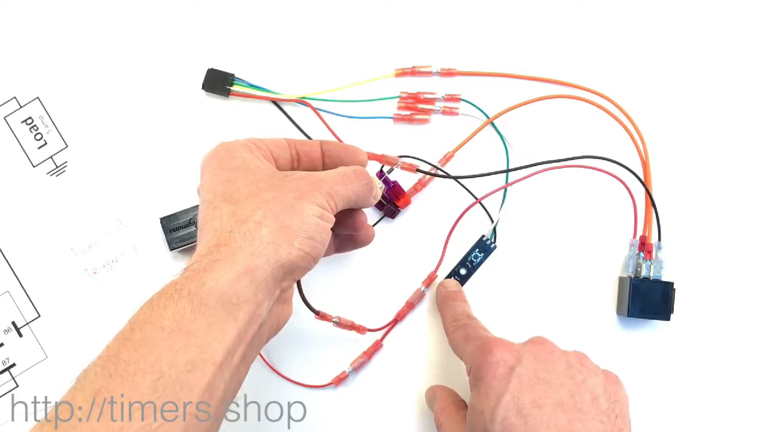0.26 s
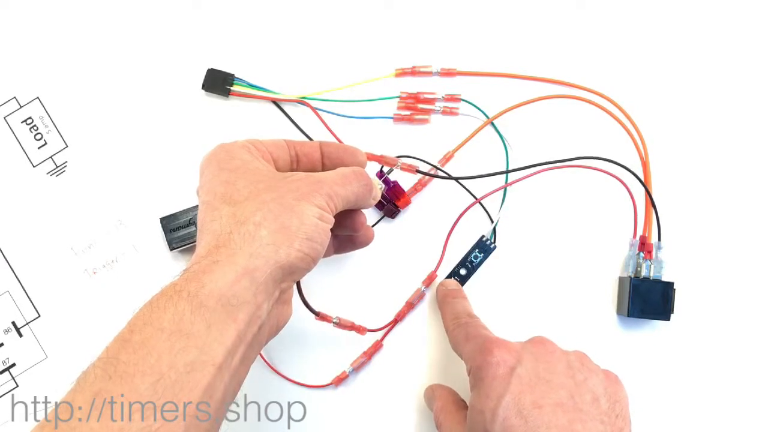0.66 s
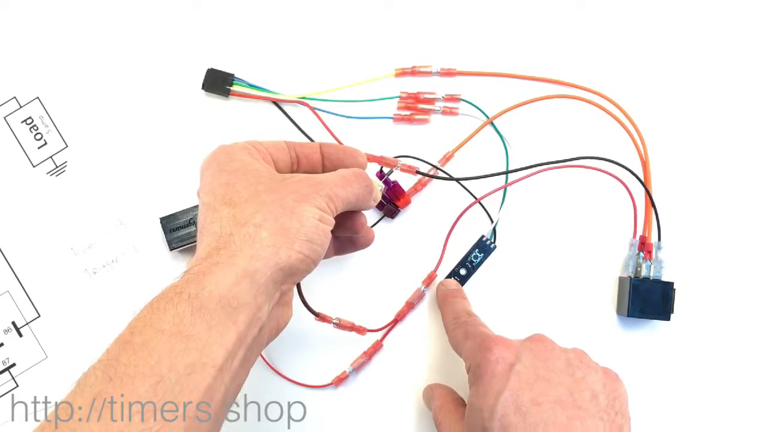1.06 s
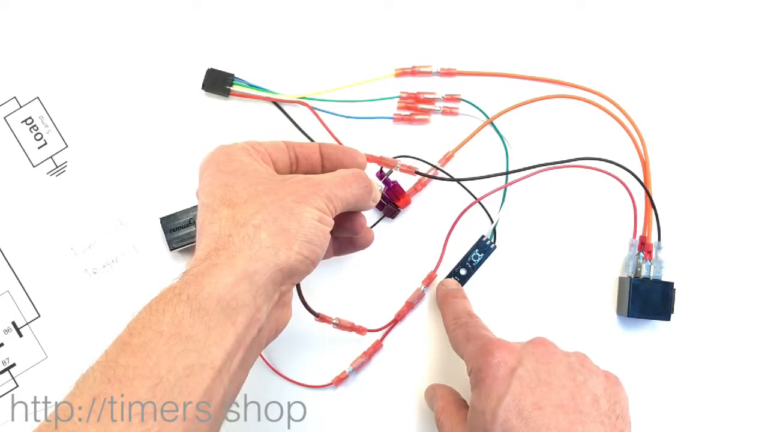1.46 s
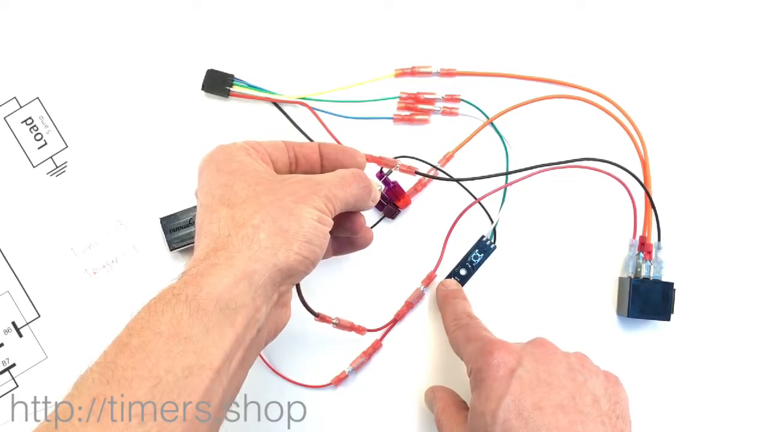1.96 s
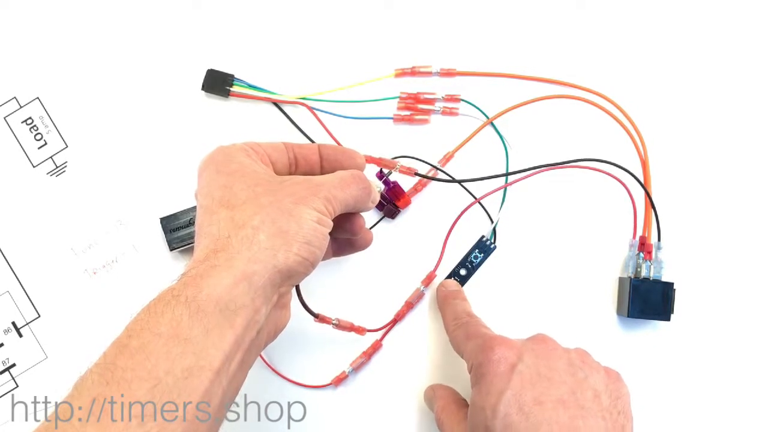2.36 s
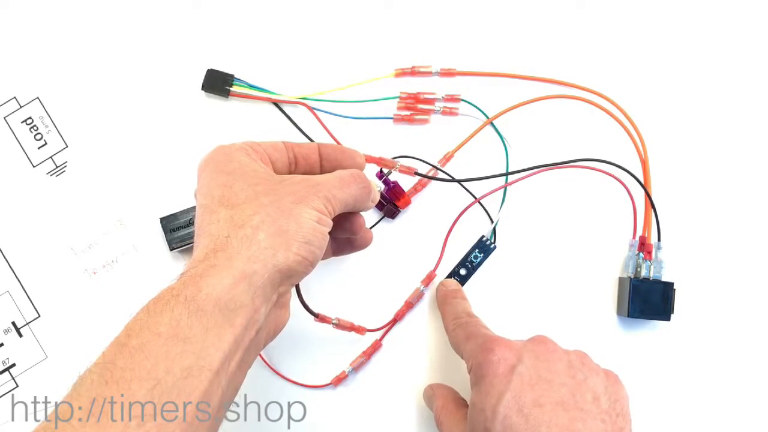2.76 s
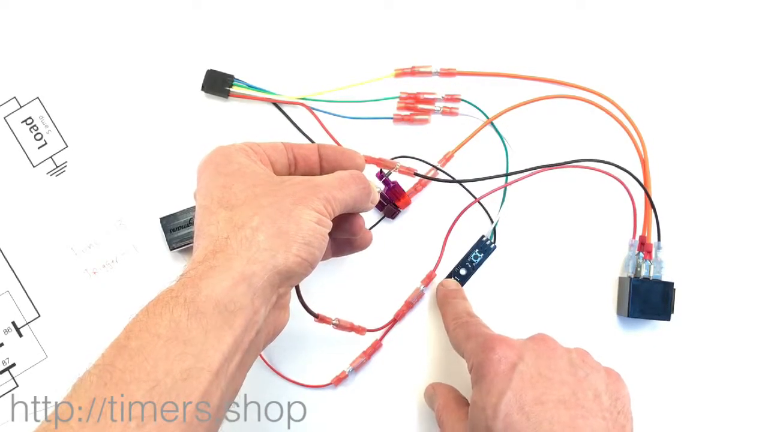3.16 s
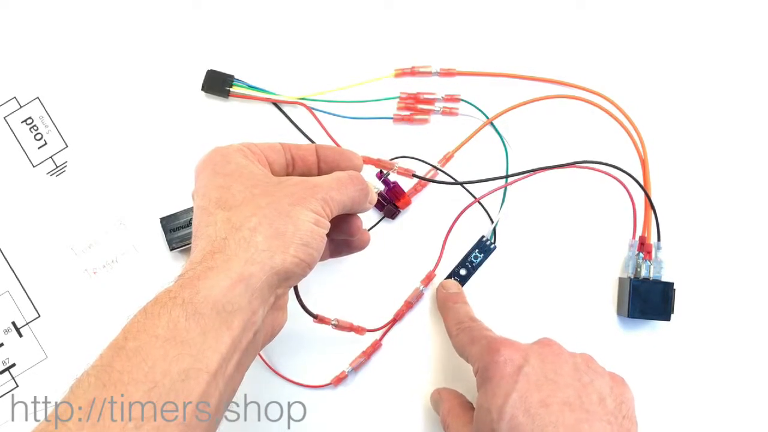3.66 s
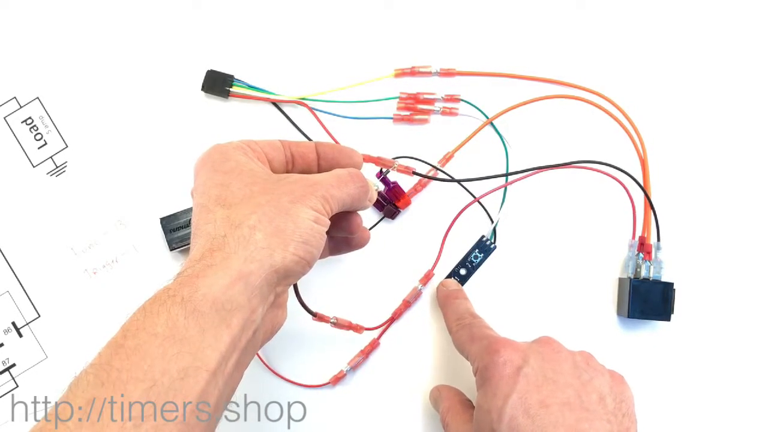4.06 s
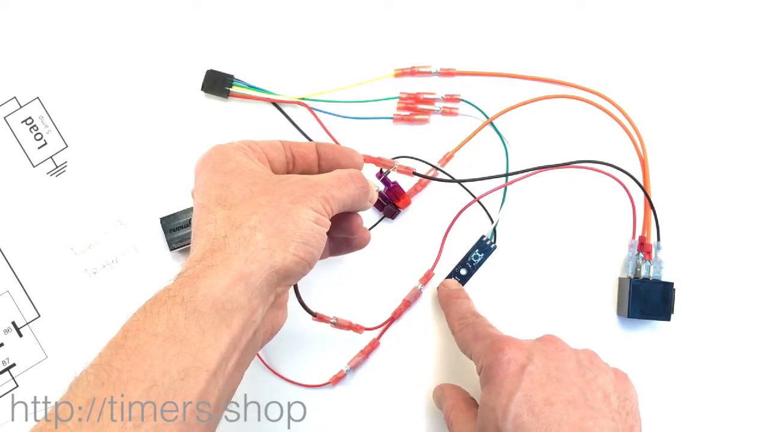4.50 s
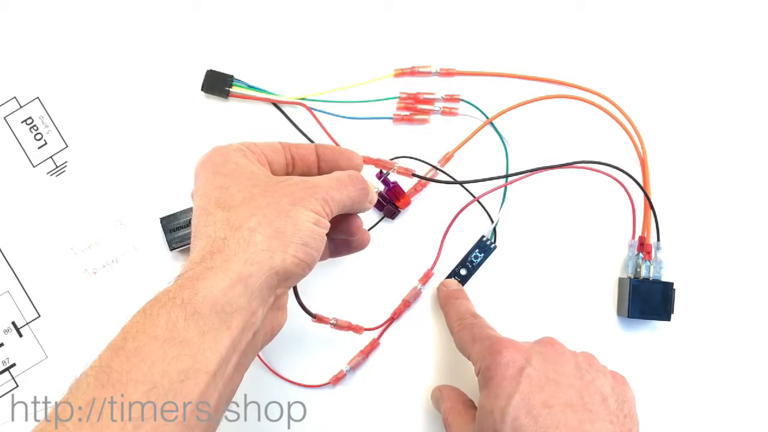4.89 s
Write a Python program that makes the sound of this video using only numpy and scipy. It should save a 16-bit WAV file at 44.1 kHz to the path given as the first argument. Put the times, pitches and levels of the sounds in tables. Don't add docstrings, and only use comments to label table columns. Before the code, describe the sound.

On a desk in a small quiet room, close to the microphone, a tiny relay snaps shut and opens repeatedly at an even pace. Each click is a hard, dry metallic tick with rapid bounces and a slight desk thud. Between them a finger softly snaps a small push button. Faint electrical hiss switches in and out over low ventilation rumble.

```python
import sys
import numpy as np
from scipy import signal
from scipy.fft import rfft, irfft, next_fast_len
from scipy.io import wavfile
from scipy.ndimage import uniform_filter1d

SR = 44100
rng = np.random.default_rng(int(sys.argv[2]) if len(sys.argv) > 2 else 0)


def waveform_to_disk(signal):
    frames = np.transpose(np.atleast_2d(signal))
    scaled = np.clip(frames, -1, 1) * 32767
    samples = np.round(scaled).astype(np.int16)
    wavfile.write(sys.argv[1], SR, samples)


def magnitude_from_level(level_db):
    exponent = np.asarray(level_db, float) / 20
    return 10 ** exponent


N = 226365
QUIET_TOP_HZ = 15790

OPENINGS = [
    .5399,
    1.2015,
    1.8233,
    2.4877,
    3.168,
    3.8611,
    4.5257,
]


def unit(x):
    return x / np.sqrt(np.mean(x ** 2) + 1e-20)


def along(points, hz):
    f, v = np.transpose(points)
    return np.interp(np.log(hz + 1), np.log(f + 1), v)


def filtered(x, response):
    m = next_fast_len(x.shape[-1] + SR // 2)
    spectrum = rfft(x, m) * response(np.fft.rfftfreq(m, 1 / SR))
    return irfft(spectrum, m)[..., :x.shape[-1]]


def peak(f, hz, width):
    return 1j * f * width / (hz * hz - f * f + 1j * f * width + 1e-9)


def noise(response):
    return unit(filtered(rng.standard_normal(N), lambda f: response(f) * (f < QUIET_TOP_HZ)))


def burst_noise(count, response):
    return unit(filtered(rng.standard_normal(count), response))


def ring(modes, t, attack, spread_db):
    t = np.maximum(t, 0)
    scatter = spread_db * rng.standard_normal(len(modes))
    total = 0
    for k, (hz, db, t60) in enumerate(modes):
        decay = magnitude_from_level(db + scatter[k] - 60 * t / t60)
        total = total + (-1) ** k * decay * np.sin(2 * np.pi * hz * t)
    return total * (1 - np.exp(-t / attack))


def add(track, s, x):
    part = track[round(s * SR):][:len(x)]
    part += x[:len(part)]


def armature(clicks, db, blows, after, tail, tail_db, thud_db):
    # pitch_hz, level_db, t60_s
    desk_modes = [(227, -4.5, 0.12), (250.4, -15.5, 0.19), (272, -9.5, 0.47), (318, -11.5, 0.068),
                  (432.5, -3.5, 0.28), (454.3, -8, 0.4), (552, -46, 0.086), (658.4, 0.5, .19),
                  (824, 3, 0.049), (1290, -14, .03)]
    air, desk, lead = np.zeros(N), np.zeros(N), 0.005
    t = np.arange(SR // 5) / SR - lead
    early = t[:SR // 25]
    grains = rng.standard_normal((len(blows), len(early)))
    rattle = filtered(grains, lambda f: peak(f, 5930, 10400) ** 2 * (f < 16900))
    fade = sum(magnitude_from_level(part_db - 60 * t / t60) for part_db, t60 in tail_db)
    fade = fade * np.clip(t / 0.0072, 0, 1) ** 2
    usual = rng.standard_normal(len(t))
    for s in clicks:
        click = ring(after, t - 0.003, attack=0.001, spread_db=3.0)
        shiver = usual + rng.standard_normal(len(t)) / 3
        click += fade * unit(filtered(shiver, lambda f: magnitude_from_level(along(tail, f)) * (f < QUIET_TOP_HZ)))
        for (ms, crack_db, modes), grit in zip(blows, rattle):
            late = early - ms / 1000 - 0.00001 * ms * rng.standard_normal()
            struck = [(hz, level, t60_ms / 1000) for hz, level, t60_ms in modes]
            blow = ring(struck, late, attack=0.00032, spread_db=0.95)
            crack = magnitude_from_level(crack_db - 60 * np.abs(late) / 0.0096) * (late > 0) * grit
            add(click, 0, blow + crack)
        add(air, s - lead, magnitude_from_level(db) * click)

        boom = burst_noise(len(t), lambda f: peak(f, 454, 540) ** 2)
        boom_fade = magnitude_from_level(-5.0 - 60 * t / 0.21) * np.clip(t / 0.0026, 0, 1)
        thud = ring(desk_modes, t - 0.001, attack=0.0042, spread_db=2.0) + boom_fade * boom
        add(desk, s - lead, magnitude_from_level(db + thud_db) * thud)
    return air, desk


def relay_closing():
    # (pitch_hz, level_db, t60_ms)
    blows = [
        (-3, -34, [(3900, -40, 16)]),
        (-0.18, -9.5, [(2276, -2.5, 8.9), (3270, 6, 2.12), (4870, -5.5, 4.6), (6350, -6, 4), (8740, -10, 4.5), (11220, -6, 6.6), (15340, -18, 14)]),
        (2.0, -9, [(3030, -6.5, 9.4), (4150, -2, 7.8), (3630, -5, 5.5)]),
        (3, -13, [(2210, -20, 3.5), (4510, -7, 13), (5500, -32, 5.4), (7700, -24, 5.5), (10820, -10, 12.3)]),
        (4.5, -22.5, [(3040, -4, 10.6), (2545, -6.5, 12.4), (3320, -13.5, 26), (6300, -9, 6.2), (10340, -5.5, 7.2), (13200, -13, 9)]),
    ]
    # pitch_hz, level_db, t60_s
    after = [(2140, -29, 0.1), (2446, -30, 0.065), (2640, -30, 0.05), (2840, -34, 0.082),
             (3020, -42, 0.044), (3460, -27, 0.019), (3980, -29.5, 0.06), (6050, -31, 0.038)]
    # pitch_hz, density_db per Hz
    tail = [(710, -57), (1200, -66), (1850, -19), (2180, -2.5), (2560, -10), (4080, -13), (5470, -7.5),
            (5970, -27), (7570, -6), (7910, -15), (10500, -10.5), (14000, -23), (16000, -58)]
    first_s, off_s = 0.0956, 0.1966
    times = [first_s] + [s + off_s for s in OPENINGS]
    return armature(times, -17, blows, after, tail, tail_db=[(-9.5, 0.035), (-37, 0.24)], thud_db=-32.5)


def relay_opening():
    # (pitch_hz, level_db, t60_ms)
    blows = [
        (0, -21, [(3830, -6.5, 16.3), (2620, -13.5, 6.5), (5800, -20, 9.8), (9560, -4.5, 2.9), (13300, -10, 4.1), (15000, -19, 6)]),
        (3.3, -8, [(2325, -4.5, 4), (6310, -15, 9.7), (12160, -13.5, 15), (15600, -4.5, 7.2)]),
        (4.0, -17, [(10360, 3.5, 4.9), (9780, -6, 5.5), (4930, -4.5, 14.4), (3270, -7.5, 4.8), (7470, -13.5, 13)]),
        (6.0, -8, [(10500, -7, 15), (6730, -29, 2.6)]),
        (8, -28, [(10270, -12.5, 6.4), (12900, -10.5, 6.7), (6450, -6, 4.3), (5070, -19, 9), (15400, -20, 7)]),
    ]
    # pitch_hz, level_db, t60_s
    after = [(2140, -40, .08), (3320, -42, 0.03), (3840, -24, .055), (4940, -21, 0.067), (10200, -37, 0.07),
             (10200, -36, 0.13), (10600, -33, .1)]
    # pitch_hz, density_db per Hz
    tail = [(710, -65), (1200, -31), (2150, -11.5), (3250, -11), (3740, -20), (4360, -7.5), (5020, -0.5),
            (5530, -18), (6950, -2), (7910, -20), (10100, 1.5), (14200, -24), (16000, -18)]
    # pitch_hz, width_hz, depth (0-1)
    shadow = (8000, 820, 0.85)
    air, desk = armature(OPENINGS, -19, blows, after, tail, tail_db=[(-6.5, 0.03), (-29.5, 0.2)], thud_db=-46)
    hz, width, depth = shadow
    return filtered(air, lambda f: 1 - depth * peak(f, hz, width)), desk


def small_case(x):
    def response(f):
        ratio = f / 1470
        return (1j * ratio) ** 2 / (1 + 1.3j * ratio - ratio ** 2)
    return filtered(x, response)


def button():
    # start_s, snap_db, thud_db
    presses = [
        (.3342, -35.5, -59),
        (.9457, -33, -56),
        (1.5783, -34, -56.5),
        (2.2528, -30.5, -54),
        (2.932, -33.5, -56.5),
        (3.6259, -33, -56),
        (4.2997, -33, -62),
        (5.0404, -33.5, -58),
    ]
    releases = [
        .4264,
        1.0847,
        1.7174,
        2.3727,
        3.057,
        3.7507,
        4.4173,
    ]
    # pitch_hz, level_db, t60_s
    dome = [(3820, -17, 0.007), (7890, -13.5, 0.015), (8450, -13, 0.0092), (10200, -8, 0.0031),
            (11800, -13, 0.0041)]
    # pitch_hz, level_db, t60_s
    pad_modes = [(122, 4.5, 0.071), (180, -5, 0.058), (262, -6, 0.064), (326, 1.5, 0.053), (489, -4, 0.084),
                 (688, -3.5, 0.092), (853, -5, 0.061), (1340, -14, 0.03)]
    release_snap_db, release_thud_db = -53, -57.5
    out, t = np.zeros(N), np.arange(SR // 10) / SR
    for s, snap_db, thud_db in sorted(list(presses) + [(s, release_snap_db, release_thud_db) for s in releases]):
        fizz = burst_noise(len(t), lambda f: peak(f, 9500, 9500) ** 2 * (f < QUIET_TOP_HZ))
        bursts = magnitude_from_level(-8.0 - 60 * t / 0.007)
        bursts += magnitude_from_level(-23.5 - 60 * np.abs(t - 0.004) / 0.019)
        bursts += magnitude_from_level(-26 - 60 * t / 0.093)
        snap = ring(dome, t, attack=0.0001, spread_db=3.0)
        snap += magnitude_from_level(7.0) * ring(dome, t - 0.0035, attack=0.001, spread_db=3.0)
        thump = magnitude_from_level(thud_db + 3.0) * ring(pad_modes, t, attack=0.0021, spread_db=0.5)
        add(out, s + 0.00062, magnitude_from_level(snap_db - 4.5) * (snap + bursts * fizz) + thump)
        scuff = burst_noise(len(t), lambda f: peak(f, 570, 1000) ** 2)
        add(out, s, magnitude_from_level(thud_db - 6.5 - 60 * t / 0.19) * (1 - np.exp(-t / 0.0062)) * scuff)
    return out


def wire():
    # start_s, peak_db
    ticks = [
        (3.795, -47),
    ]
    out, t = np.zeros(N), np.arange(SR // 10) / SR
    modes = [(5200, 2, 0.004), (3300, -4, 0.005), (6600, -5, 0.005)]  # Hz, dB, t60 s
    for s, db in ticks:
        add(out, s, magnitude_from_level(db - 3) * ring(modes, t, attack=0.0003, spread_db=1.0))
    return out


def walls(x):
    # pitch_hz, t60_s
    decay = [(300, 0.15), (2000, 0.13), (6000, 0.14), (10500, 0.21), (16000, 0.13)]
    hz, t, z = signal.stft(rng.standard_normal(SR // 2), SR, nperseg=256)
    tail = signal.istft(z * magnitude_from_level(-60 * t / along(decay, hz)[:, None]), SR, nperseg=256)[1]
    tail = filtered(tail, lambda f: f < QUIET_TOP_HZ)
    delayed = np.pad(x, (150, 0))
    return signal.fftconvolve(delayed, tail / np.linalg.norm(tail))[:N]


def hiss():
    # start_s, stop_s
    spans = [
        (0, 0.502),
        (0.746, 1.144),
        (1.218, 1.804),
        (2.682, 3.093),
        (4.06, 4.465),
    ]
    # pitch_hz, density_db per Hz
    colour = [(100, -31), (300, 4.5), (700, 1), (1400, 1.5), (3000, 1), (6000, -1), (10000, -3),
              (14000, -6), (17000, -11)]
    t = np.arange(N) / SR
    gate = magnitude_from_level(-59) * sum(1. * (t >= start) * (t < stop) for start, stop in spans)
    return uniform_filter1d(gate, size=45) * noise(lambda f: magnitude_from_level(along(colour, f)))


def low_hum():
    # peak_s, peak_db
    surges = [
        (.27, -63),
        (.97, -59),
        (1.5, -63),
        (1.69, -67),
        (2.47, -64),
        (3.03, -63),
        (3.73, -56),
        (4.25, -66),
        (4.81, -66),
    ]
    hum_hz, rest_db, surge_s = 167.5, -69.5, 0.045
    t = np.arange(N) / SR
    swell = magnitude_from_level(rest_db) + sum(magnitude_from_level(db) * np.exp(-((t - s) / surge_s) ** 2) for s, db in surges)
    drift = noise(lambda f: peak(f, 0, 10.4) * (f > 1))
    return swell * np.sin(2 * np.pi * hum_hz * t + 0.73 * drift)


def digital_whine():
    t, out = np.arange(N) / SR, np.zeros(N)
    for k in range(2, 14):
        out += magnitude_from_level(-79.5 - 0.82 * k) * np.sin(2 * np.pi * (1000 * k * t + rng.random()))
    return out


def ventilation():
    # pitch_hz, density_db per Hz
    rumble = [(15, -43), (30, 2), (60, 0), (100, -7.5), (200, -12), (330, -17.5), (520, -24), (900, -21.5),
              (1300, -22.5), (2000, -24.5), (4000, -30.5), (8000, -33.5), (16000, -37.5)]
    # pitch_hz, width_hz, level_db
    fan = [(258.4, 41, -72.5), (655, 25, -79.5)]
    out = magnitude_from_level(-60) * noise(lambda f: magnitude_from_level(along(rumble, f)))
    for hz, width, db in fan:
        out += magnitude_from_level(db) * noise(lambda f: peak(f, hz, width) ** 2)
    return out


def scene():
    closing, closing_thud = relay_closing()
    opening, opening_thud = relay_opening()
    near = small_case(closing + opening) + closing_thud + opening_thud + button() + wire()
    background = hiss() + ventilation() + low_hum() + digital_whine()
    return (near + magnitude_from_level(-20.5) * walls(near) + background)[None]


def top_cut(x):
    return signal.sosfilt(signal.butter(12, 17150, fs=SR, output="sos"), x)


def record(dry):
    # pitch_hz, width_hz, depth (0-1)
    dips = [(4850, 380, 0.46), (7820, 850, 0.4), (10340, 690, 0.45)]
    # pitch_hz, level_db
    top_curve = [(15900, 0), (16300, -10), (16700, -28), (17200, -60)]
    notched = filtered(dry, lambda f: 1 - sum(depth * peak(f, hz, width) for hz, width, depth in dips))
    mix = filtered(notched, lambda f: magnitude_from_level(along(top_curve, f)))
    return top_cut(mix)


dry = scene()
out = record(dry)
waveform_to_disk(out)
```